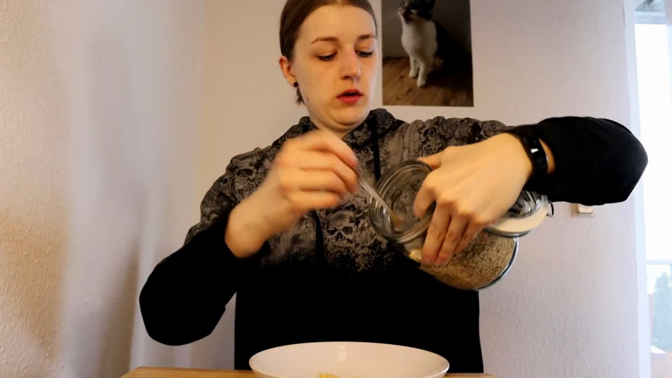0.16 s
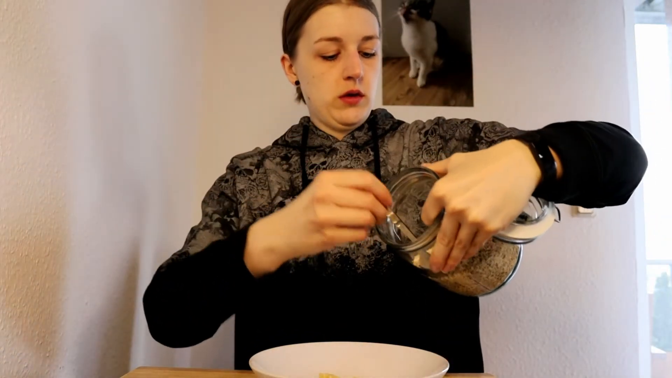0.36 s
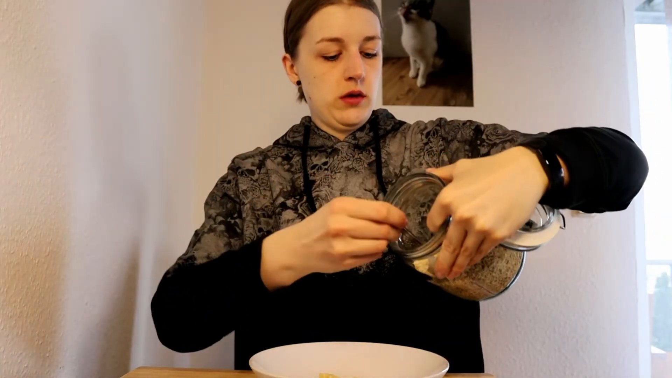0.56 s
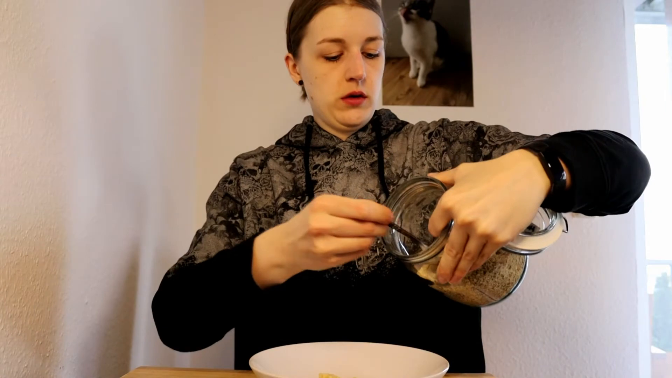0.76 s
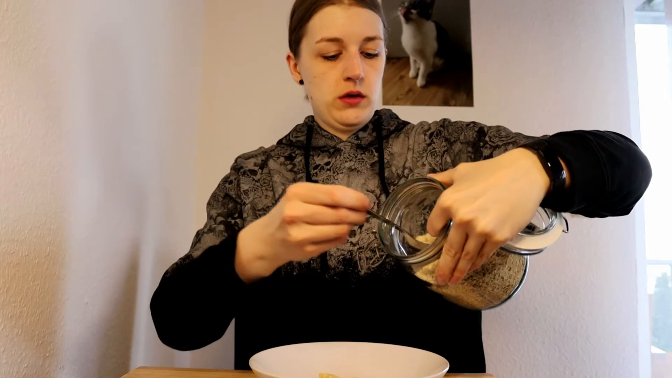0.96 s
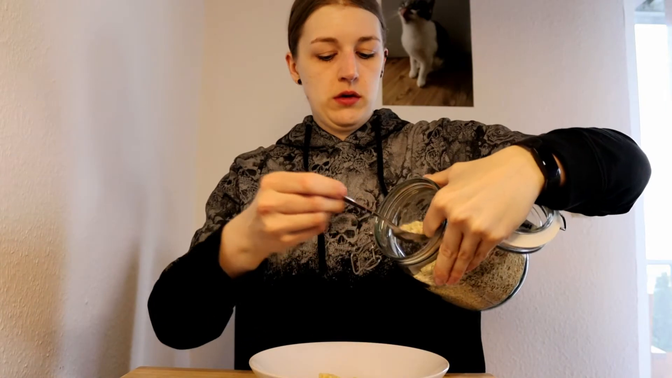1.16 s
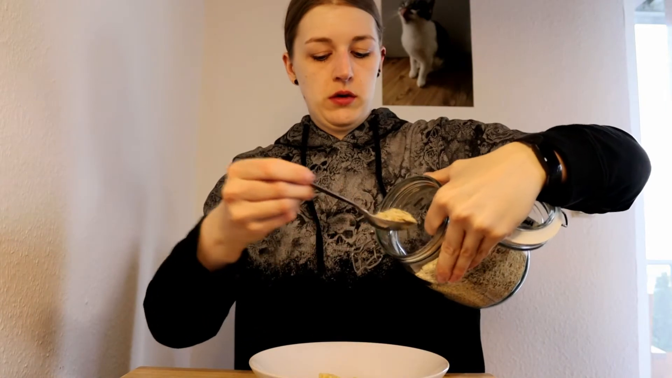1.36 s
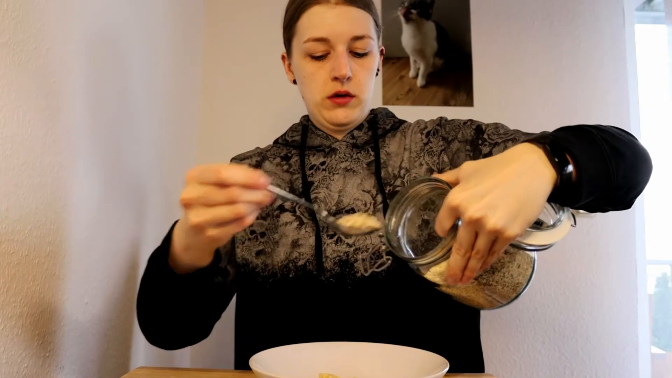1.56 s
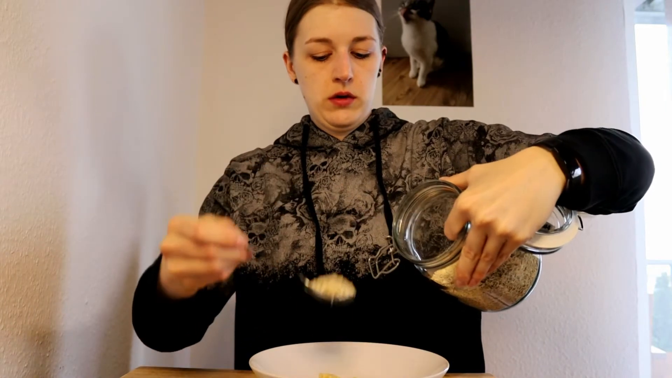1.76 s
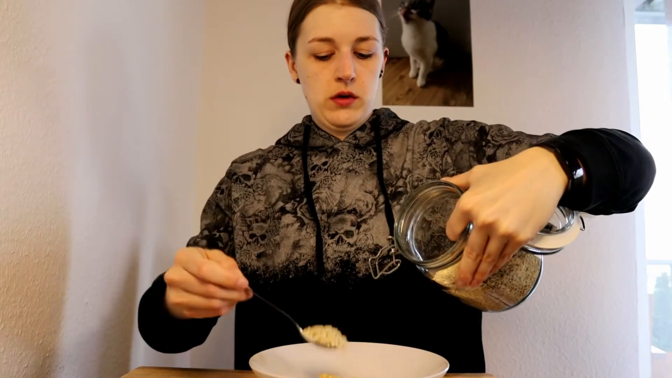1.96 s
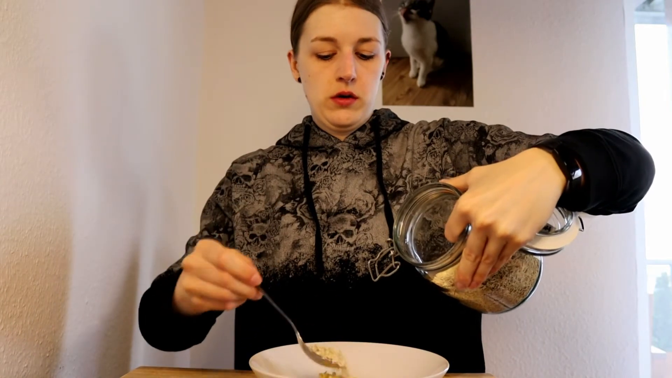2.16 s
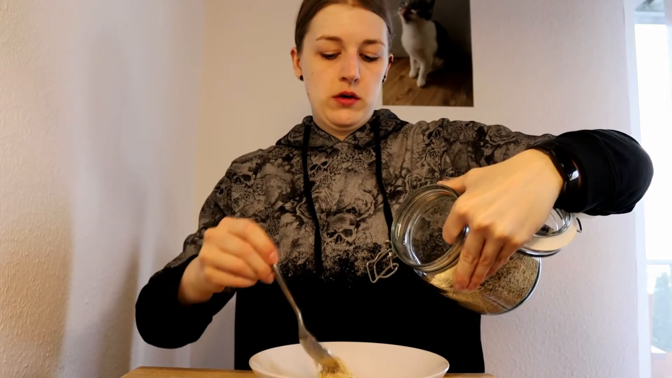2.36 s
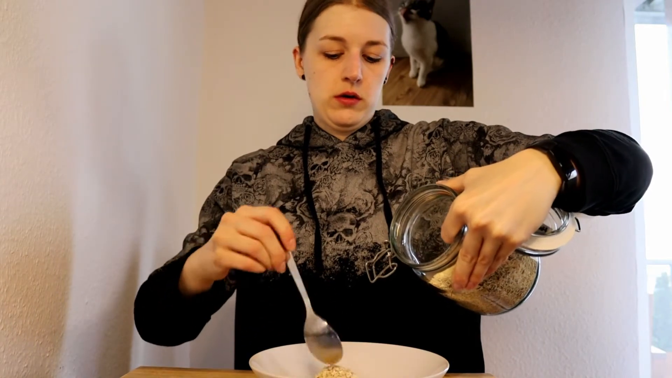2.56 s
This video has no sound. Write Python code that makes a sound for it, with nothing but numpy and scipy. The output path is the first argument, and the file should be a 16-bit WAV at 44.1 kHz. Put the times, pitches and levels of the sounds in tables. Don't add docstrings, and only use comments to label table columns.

```python
import sys
import numpy as np
from scipy import signal
from scipy.fft import rfft, irfft, next_fast_len
from scipy.io import wavfile
from scipy.ndimage import uniform_filter1d

SR = 44100
rng = np.random.default_rng(int(sys.argv[2]) if len(sys.argv) > 2 else 0)


def to_wav(s):
    ch = np.atleast_2d(s).T
    pcm = np.round(np.clip(ch, -1, 1) * 32767)
    wavfile.write(sys.argv[1], SR, pcm.astype(np.int16))


def invert_db(x):
    u = np.asarray(x, float) / 20
    return 10 ** u


N = 114660
T = np.arange(N) / SR

# pitch_hz, level_db, t60_s
JAR_MODES = [(1392, -30, 0.11), (1546, -16.5, 0.2285), (1622, -6, 0.1), (1658, -6, .09),
             (1794, -11.5, 0.11), (1900, -22.5, 0.24), (1980, -27.5, 0.18), (2083, -19.5, 0.052),
             (2190, -28.5, 0.13), (2495, -19.5, 0.084), (2710, -29, 0.066)]
# pitch_hz, level_db, t60_s
SPOON_MODES = [(3860, -12, 0.087), (4520, -18, .06), (5120, -2, 0.092), (5300, -5.5, 0.089),
               (5800, -15, 0.086), (8315, -2, 0.089), (8930, -8.5, 0.06), (10590, 2, 0.042),
               (11300, -13, 0.063), (12755, -0.5, 0.063), (14420, -7, .07)]
# pitch_hz, level_db, t60_s
TAIL_MODES = [(3775, -13, 0.33), (4930, -16, .3), (8538, -17, 0.5), (12800, -19, .45)]
# start_s, jar_db, spoon_db, crack_db
CLINKS = [
    (.2229, -9, -22, -3),
    (.2247, -30, -28.5, -15),
    (.2308, -32, -56, -19),
    (.2647, -24, -67, -38.5),
    (.274, -36, -47, -50),
    (.3026, -35, -71, -52.5),
    (.3156, -25.5, -57, -35),
    (.3695, -35.5, -62, -52),
    (.39, -49, -67, -55),
]
# start_s, level_db
SNICK = [
    (.2229, 6.5),
]
# freq_hz, level_db per Hz
CRACK_COLOUR = [(300, -57), (1200, -17), (3270, -5), (4870, -7), (6900, -21.5), (10600, -3), (12000, -22.5),
                (14000, -9), (15800, -14.5)]
# pitch_hz, level_db, t60_s
LID_MODES = [(826, -14, .03), (1144, -3, 0.055), (1250, -9, 0.052), (1550, 1, 0.015), (1938, 1.5, 0.1),
             (1940, -1.5, 0.033), (2300, -8, 0.02), (2740, -10.5, 0.013), (3836, -20, 0.02),
             (4630, -6, 0.015), (5170, -18, 0.014)]
# start_s, level_db
LID_KNOCKS = [
    (.018, -34),
    (.0205, -29),
    (.029, -32),
    (.043, -48.5),
]
# start_s, level_db, pitch_hz,
# t60_s
THUDS = [(.2229, -32, 750, 0.046), (.2229, -41, 480, 0.015), (0.264, -42.5, 1148, 0.15),
         (.2647, -22, 1630, .035), (.273, -26, 1640, .03), (.312, -33, 1615, .06), (0.803, -56, 960, .03),
         (1.153, -51, 810, .08), (2.0467, -54, 2450, 0.027), (2.588, -51, 2440, 0.027),
         (1.18, -57, 1900, 0.033), (2.062, -43, 1783, 0.057), (2.32, -47.5, 1750, 0.041)]
# pitch_hz, level_db, t60_s
DAMPED_WALL_MODES = [(960, 2.5, 0.03), (1410, -1, .02), (1750, -3.5, 0.1), (1870, 4.5, 0.032)]
TOUCH_S = [.7985, .808, .822, .842, .856]
TOUCH_DB = [-46.5, -51, -65, -53.5, -55]
# start_s, level_db
SCOOP = [
    (.3, -71),
    (.42, -56.5),
    (.55, -58.5),
    (.62, -65.5),
    (.85, -61.5),
    (1.0, -61.5),
    (1.1, -71),
    (1.22, -61.5),
    (1.32, -89),
]
# freq_hz, level_db per Hz
OATS_COLOUR = [(1500, -17.5), (2800, -4.5), (4700, 0.5), (6500, -6), (8200, -3), (10500, -7.5),
               (13000, -2.5), (15500, -2)]
# start_s, level_db, centre_hz, length_s
SNAPS = [
    (.548, -67, 4900, 0.0028),
    (0.736, -52, 9000, .005),
    (0.857, -52, 11000, 0.0075),
    (0.96, -52, 11000, .004),
    (0.985, -49.5, 12070, 0.011),
    (1.027, -55, 12000, 0.0081),
    (1.111, -55, 11950, 0.0026),
    (1.18, -44.5, 12300, 0.0058),
    (1.215, -48.5, 11800, 0.0037),
]
# pitch_hz, level_db, t60_s
BOWL_MODES = [(2465, -6, 0.022), (3857, -7, 0.064), (4086, 1, 0.034), (4500, -10, .02), (6370, -1, 0.069),
              (6694, -11, 0.088), (8030, -9, 0.031), (9400, -13.5, 0.028), (9600, -6.5, 0.14),
              (10400, -19, 0.029), (11000, -14, 0.02), (12600, -20, 0.043), (13040, 0.5, 0.046),
              (13950, -16, .02)]
# start_s, ring_db, tick_db
FLAKES = [(1.951, -51.5, -56), (2.0476, -46, -50), (2.054, -70, -47), (2.1294, -71, -53.5),
          (2.2002, -57, -57), (2.2222, -55, -51), (2.287, -60, -62), (2.371, -57, -65), (2.382, -57, -58),
          (2.3923, -49.5, -56), (2.41, -53, -63), (2.433, -64, -62), (2.448, -55.5, -62),
          (2.4576, -59, -61), (2.47, -54.5, -60), (2.505, -59, -63), (2.5185, -53, -56),
          (2.5295, -49.5, -47), (2.545, -55, -55), (2.556, -63, -57), (2.566, -66, -62), (2.579, -56, -62),
          (2.59, -54, -56)]
# start_s, heap_hiss_db, bare_china_db
POUR = [
    (2.15, -70, -110),
    (2.28, -59, -110),
    (2.35, -56, -86),
    (2.4, -53, -84),
    (2.44, -58, -87),
    (2.49, -56.5, -89),
    (2.53, -59, -84),
    (2.6, -59, -85),
]
# start_s, level_db
RUMBLE = [
    (2.25, -92),
    (2.38, -56),
    (2.5, -63),
    (2.6, -65),
]
# freq_hz, level_db per Hz
CAR_COLOUR = [(59, -46), (100, -9.5), (245, -5.5), (279, -4.5), (609, -10), (845, -5), (1350, -9.5),
              (3000, -33), (3900, -48.5), (6600, -120)]
# start_s, level_db, tilt_db per octave
PASSING = [
    (0, -67, -8),
    (.5, -56.5, 0.5),
    (.9, -56.5, -1.5),
    (1.2, -51.5, -0.5),
    (1.6, -51.5, 1.5),
    (1.9, -49.5, -1),
    (2.2, -51, -1.5),
    (2.6, -54, -1.5),
]
# freq_hz, level_db per Hz
HOUSE_COLOUR = [(15, -22), (25, -10), (236, -3.5), (277, -5), (405, -15), (545, -9), (936, -12.5),
                (1650, -17), (16000, -33.5)]
# pitch_hz, width_hz, boost_db
KITCHEN_MODES = [(103.5, 15, 3), (184, 17, 7), (235, 42, 3), (319.4, 27, 6), (384, 47, 5.5), (476, 38, 5),
                 (956, 285, 4)]


def level(x, db):
    return x * invert_db(db) / np.sqrt(np.mean(x ** 2))


def curve(rows, axis=1):
    rows = np.array(rows)
    return np.interp(T, rows[:, 0], rows[:, axis])


def colour(x, points):
    size = next_fast_len(N + 4096)
    f = np.arange(size // 2 + 1) * SR / size + 1e-3
    p = np.array(points)
    gain = invert_db(np.interp(np.log(f), np.log(p[:, 0]), p[:, 1]))
    return irfft(rfft(x, size) * gain, size)[..., :N]


def band(x, hz, width):
    return signal.lfilter(*signal.iirpeak(min(hz, .45 * SR), hz / width, fs=SR), x)


def walk(rate):
    k = int(SR / rate)
    held = np.repeat(rng.standard_normal(N // k + 1), k)
    return 1.3 * uniform_filter1d(uniform_filter1d(held, k), k)[:N]


def pulses(rows, axis=1):
    rows = np.array(rows)
    x = np.zeros(N)
    np.add.at(x, (rows[:, 0] * SR).astype(int), invert_db(rows[:, axis]))
    return x


def ring(x, modes, spread, partner_db, count=4):
    uneven_rad, onset_fade_s, partner_life = 0.76, 0.00033, 0.54
    t, shape = T[:SR // 2], 0
    for k, (hz, db, t60) in enumerate(modes):
        c = rng.standard_normal((5, count))
        partner_hz = hz * (1 + spread * c[0, :, None])
        partners = np.sin(2 * np.pi * partner_hz * t) * invert_db(-60 * t / (partner_life * t60))
        sides = c[1:3] + .5 * c[3]
        lead = uneven_rad * np.sign(c[4, 0]) * np.array([[1], [-1]])
        main = (-1) ** k * np.sin(2 * np.pi * hz * t + lead) * invert_db(-60 * t / t60)
        shape = shape + invert_db(db) * (main + invert_db(partner_db) * sides @ partners)
    shape = shape * np.clip(t / onset_fade_s, 0, 1)
    y = signal.fftconvolve(x[None], shape, axes=1)[:, :N]
    lowest_hz = min(m[0] for m in modes)
    return signal.sosfilt(signal.butter(3, 0.8 * lowest_hz, "high", fs=SR, output="sos"), y)


def burst(x, length_s):
    envelope = signal.lfilter([1], [1, -np.exp(-1 / (length_s * SR))], x)
    return envelope * rng.standard_normal(N)


def grains(per_s, spread_db):
    c = rng.random((3, N))
    hit = c[0] < per_s / SR
    size = invert_db(-spread_db * np.log(c[2] + .004))
    return level(hit * np.sign(c[1] - .5) * size, 0)


def clinks():
    crack = burst(pulses(CLINKS, axis=3), 0.0049) + burst(pulses(SNICK), 0.00025)
    glass = ring(pulses(CLINKS), JAR_MODES, 0.028, -17.5)
    steel = ring(pulses(CLINKS, axis=2), SPOON_MODES, 0.023, -1)
    return glass + steel + colour(crack, CRACK_COLOUR)


def lid_knock():
    return ring(pulses(LID_KNOCKS), LID_MODES, 0.1, -10.0)


def wall_touches():
    return ring(pulses(np.c_[TOUCH_S, TOUCH_DB]), DAMPED_WALL_MODES, 0.025, -4.5)


def short_thuds():
    return sum(ring(pulses([(s, db)]), [(hz, 0, t60)], 0.022, 0.64) for s, db, hz, t60 in THUDS)


def scoop():
    rustle = level(colour(grains(2500, spread_db=3.), OATS_COLOUR), 0)
    return rustle * invert_db(curve(SCOOP) + 1.5 * walk(25))


def snaps():
    return sum(band(burst(pulses([(s, db + 0.5)]), length), hz, 0.58 * hz) for s, db, hz, length in SNAPS)


def jar():
    hits = clinks() + lid_knock() + wall_touches() + short_thuds()
    rustle = scoop()
    snapping = snaps()
    tails = ring(pulses(CLINKS, axis=2) + invert_db(-36.5) * rustle, TAIL_MODES, .004, -12)
    return hits + rustle + snapping + tails


def bowl():
    pouring = T > 2.1
    strikes = grains(450, spread_db=1.5) * invert_db(curve(POUR, axis=2)) * pouring
    hiss = grains(1600, spread_db=-2.5) * invert_db(curve(POUR) + 2.7 * walk(29.98)) * pouring
    china = ring(pulses(FLAKES) + strikes, BOWL_MODES, .025, -3)
    ticks = burst(pulses(FLAKES, axis=2), 0.0051)
    return china + band(ticks + hiss, 8200, 18200)


def table_rumble():
    boom = band(band(rng.standard_normal(N), 70, 120), 70, 120)
    return level(boom, 0) * invert_db(curve(RUMBLE))


def room(x):
    t60_low_s, t60_high_s, gap_s, room_db = 0.36, 0.21, 0.0023, -5.5
    t = T[:SR // 2]
    noise = rng.standard_normal((2, len(t)))
    low = signal.lfilter(*signal.butter(2, 2500, fs=SR), noise)
    tail = low * invert_db(-60 * t / t60_low_s) + (noise - low) * invert_db(-60 * t / t60_high_s)
    tail = tail * np.clip(t / gap_s - 1, 0, 1)
    tail = invert_db(room_db) * tail / np.sqrt(np.sum(tail ** 2) / 2)
    return signal.fftconvolve(x[None], tail, axes=1)[:, :N]


def wide(points):
    alike_hz = 1620
    mid, side = rng.standard_normal((2, N))
    high = signal.lfilter(*signal.butter(1, alike_hz / 2, "high", fs=SR), side)
    side = 0.1 * side + 0.83 * high
    return colour(np.array([mid + side, mid - side]), points)


def car():
    noise = wide([(40, -25.5)] + list(CAR_COLOUR) + [(6000, -62.0)])
    tilt = curve(PASSING, axis=2)
    passing = 0
    for hz in 125 * 2. ** np.arange(0, 4.6, .5):
        gain = invert_db(tilt * np.log2(hz / 500) + 1.5 * walk(6))
        passing = passing + band(noise, hz, hz / 3) * gain
    return level(passing, 0) * invert_db(curve(PASSING))


def background():
    x = car() + level(wide(HOUSE_COLOUR), -58)
    x = x + sum((invert_db(db) - 1) * band(x, hz, width) for hz, width, db in KITCHEN_MODES)
    hiss = level(band(rng.standard_normal((2, N)), 12900, 4000), -72)
    hum = level(band(rng.standard_normal(N), 52.6, 4.1), -68.5)
    return x + hiss + hum


def scene():
    side = np.array([[.5], [-.5]])
    at_jar, at_bowl = jar(), bowl()
    rumble = table_rumble()
    direct = at_jar * invert_db(-3.5 * side) + at_bowl * invert_db(-4 * side)
    echoes = room((at_jar + at_bowl).mean(axis=0))
    return direct + echoes + background() + rumble


def band_limit(x):
    return signal.sosfilt(signal.butter(12, 16530, fs=SR, output="sos"), x)


def record(dry):
    x = signal.sosfilt(signal.ellip(6, .3, 30, 15750, fs=SR, output="sos"), dry)
    mix = np.clip(x, -1, 1)
    return band_limit(mix)


dry = scene()
out = record(dry)
to_wav(out)
```